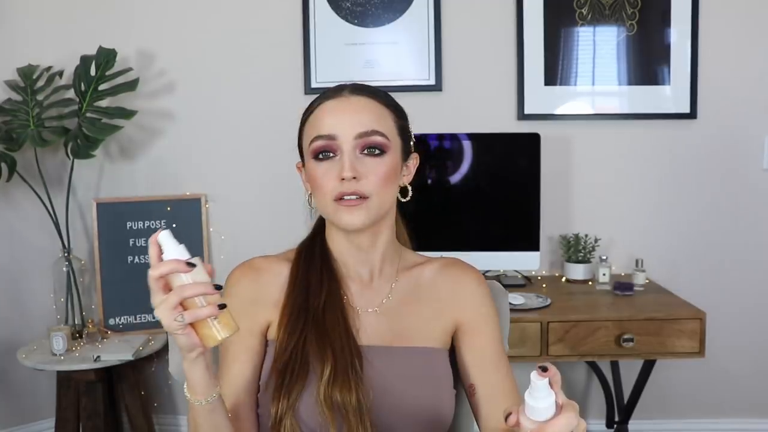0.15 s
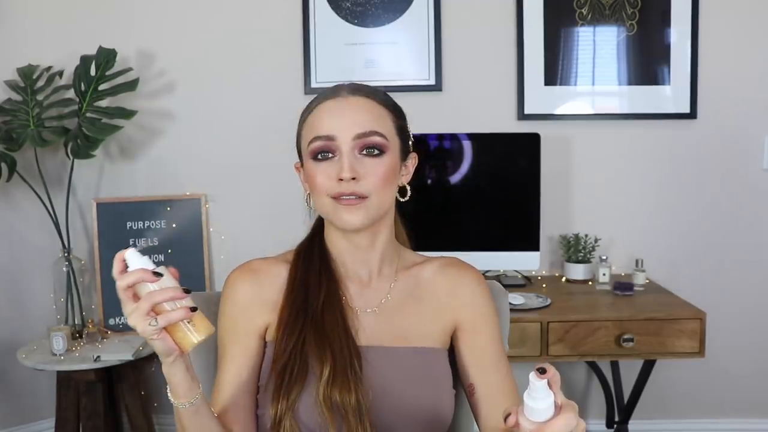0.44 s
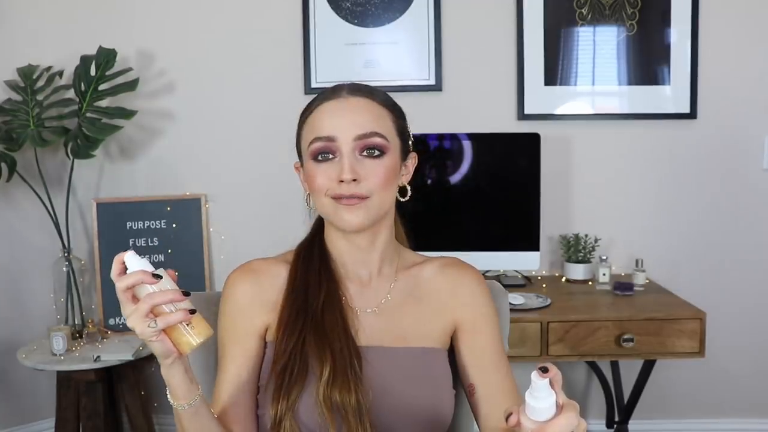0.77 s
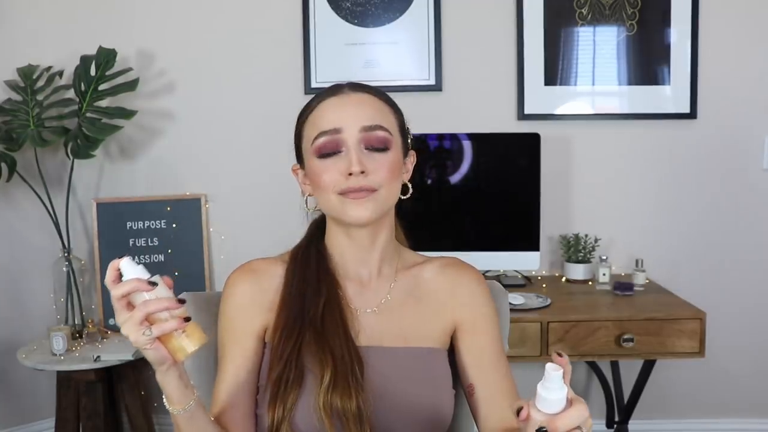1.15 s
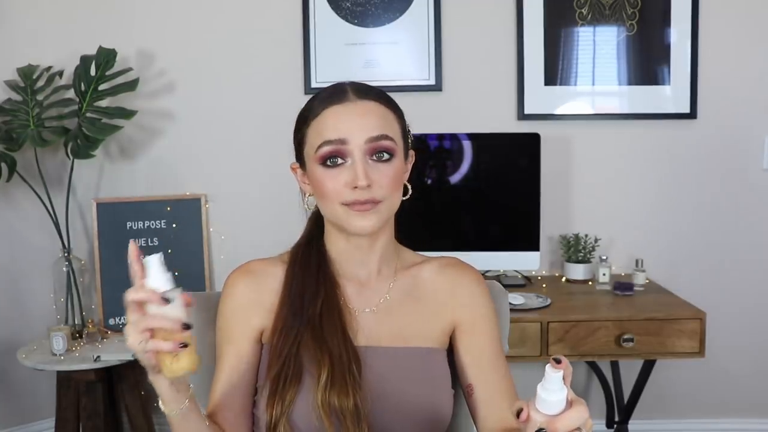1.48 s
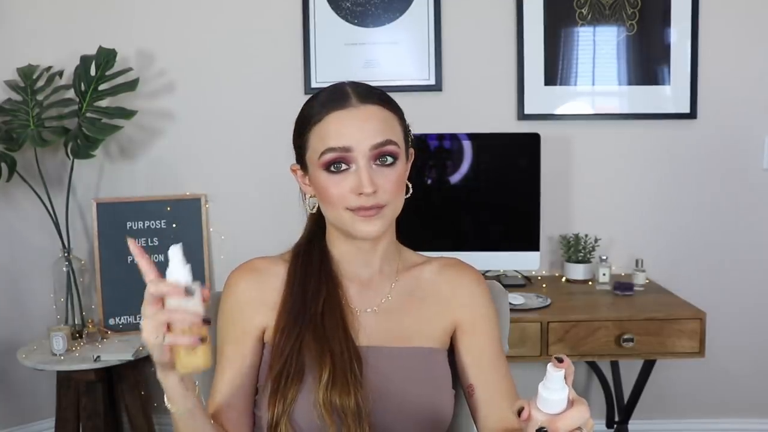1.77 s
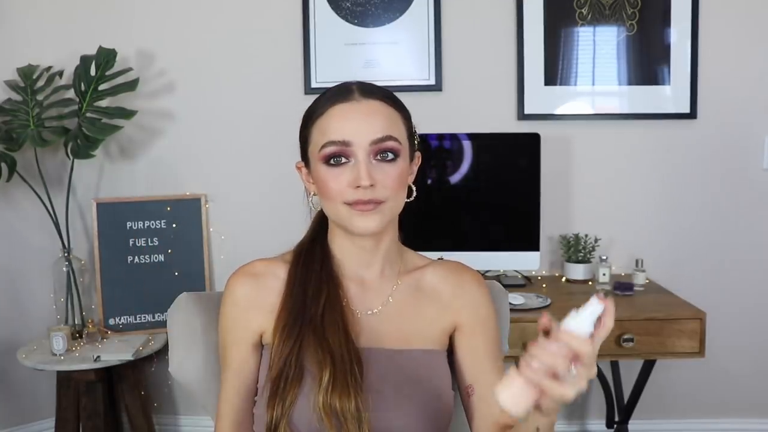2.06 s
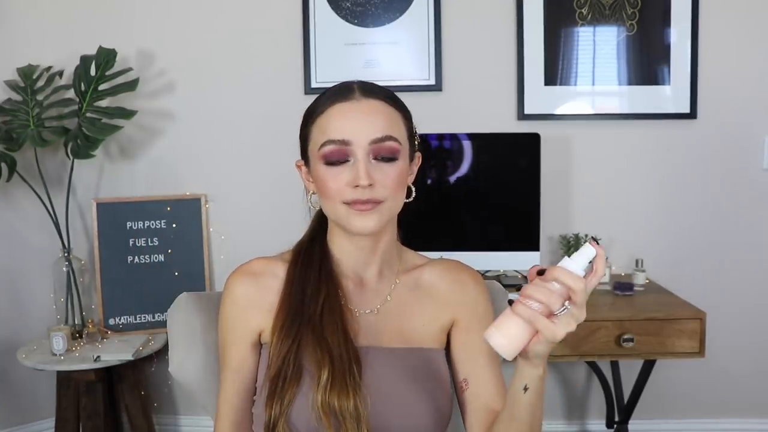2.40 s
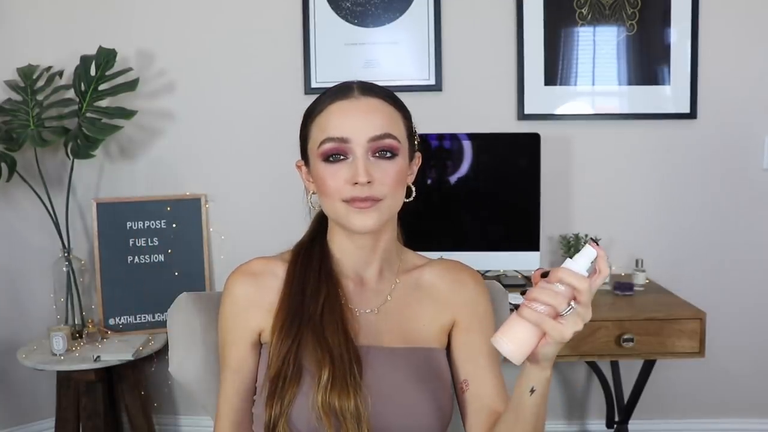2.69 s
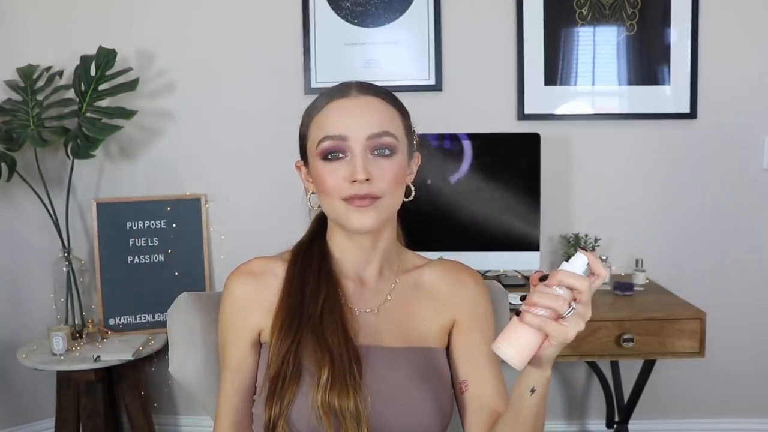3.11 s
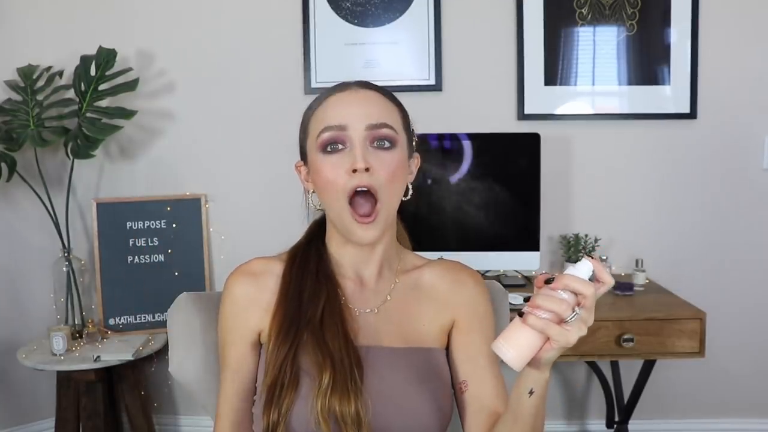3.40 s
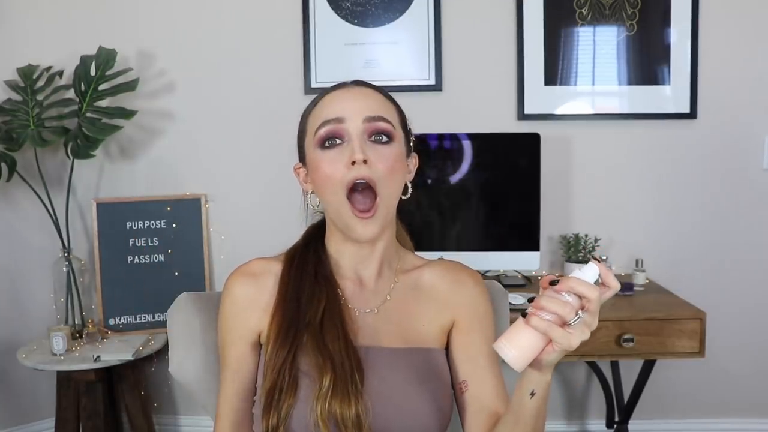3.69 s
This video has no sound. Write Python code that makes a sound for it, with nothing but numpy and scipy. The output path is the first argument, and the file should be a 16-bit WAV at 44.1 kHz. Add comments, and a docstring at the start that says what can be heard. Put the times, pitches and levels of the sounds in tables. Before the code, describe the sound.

Two sprays from pump bottles, one brief, one longer, with small plastic clicks indoors.

```python
"""Two pump bottles are sprayed in a small room, close to one microphone.
Mains hum, a faint buzz and thin electronic hiss run throughout: harmonic sines and filtered noise.
Ringing plastic ticks and small wet clicks lead to a short, coarse spritz of pressure-shaped noise.
More ticks and dull bottle knocks follow, then soft handling rustle: swells of filtered noise.
After further ticks comes a longer, finer mist; small wet clicks run through it and one last follows."""
import sys
import numpy as np
from scipy import signal
from scipy.fft import rfft, irfft, next_fast_len
from scipy.io import wavfile

SR = 44100
rng = np.random.default_rng(int(sys.argv[2]) if len(sys.argv) > 2 else 0)


def unload_wav(signal):
    """Save mono or channel-first audio to the path in sys.argv[1] as 16-bit WAV at rate SR, clipped to [-1, 1]."""
    wavfile.write(
        sys.argv[1],
        SR,
        np.round(np.clip(np.atleast_2d(signal).T, -1, 1) * 32767).astype(np.int16),
    )


N = 169785


def amp(db):
    """Decibels to gain."""
    return 10 ** (np.asarray(db) / 20)


def curve(points, hz):
    """Read (Hz, value) points on a log-frequency axis."""
    point_hz, values = np.array(sorted(points), float).T
    return np.interp(np.log(np.maximum(hz, 1)), np.log(point_hz), values)


def colour(x, points):
    """Filter by (Hz, dB) points."""
    size = next_fast_len(len(x) + 4096)
    gain = amp(curve(points, np.fft.rfftfreq(size, 1 / SR)))
    return irfft(rfft(x, size) * gain, size)[:len(x)]


def noise(points):
    """Noise with a given density in dB per Hz."""
    return colour(rng.standard_normal(N), points) * np.sqrt(SR / 2)


def fade(t, t60):
    """Exponential decay, 60 dB down after t60 seconds."""
    return np.exp(-np.log(1000) * t / max(t60, 1e-4))


def add(out, start, x):
    """Mix a sound in at a time in seconds."""
    i = max(int(start * SR), 0)
    out[i:i + len(x)] += x[:max(N - i, 0)]


def electronics():
    """Mains harmonics make a hum with a faint buzz above it; hiss is part shared, part per channel."""
    # stronger mains lines: harmonic (multiple of the mains), level_db (rms)
    hum = [(1, -35.5), (2, -62), (3, -58.5), (4, -66), (5, -72.5), (6, -74.5), (7, -67), (8, -73), (9, -64),
           (11, -77), (13, -77), (15, -75.5), (17, -79.5), (19, -78), (23, -76.5)]
    # hiss common to both channels: pitch_hz, density_db (per Hz)
    shared_hiss = [(20, -88), (42, -79), (100, -87), (200, -89.5), (400, -94), (600, -99), (750, -97),
                   (1100, -101), (2500, -103), (3100, -101), (3800, -104), (8000, -105), (15500, -107)]
    # hiss separate in each channel: pitch_hz, density_db (per Hz)
    channel_hiss = [(135, -135), (175, -101.5), (400, -100), (900, -100.5), (1500, -105), (3000, -105),
                    (6000, -103), (15500, -102.3)]
    mains_hz = 60
    buzz_db, buzz_fall_db = -84, -1  # other lines: rms level at 1 kHz, change per octave

    t = np.arange(N) / SR
    lines = {round(k): db for k, db in hum}
    out = noise(shared_hiss)
    phases = rng.uniform(0, 2 * np.pi, size=42)
    for k, phase in enumerate(phases, 1):
        buzz_line_db = buzz_db + buzz_fall_db * np.log2(k * mains_hz / 1000)
        db = lines.get(k, buzz_line_db)
        out = out + np.sqrt(2) * amp(db) * np.sin(2 * np.pi * k * mains_hz * t + phase)
    return out + np.array([noise(channel_hiss), noise(channel_hiss)])


def room_response():
    """Dense wall reflections after a short gap, each noise band dying at its own rate."""
    # decay of the room: pitch_hz, t60_s
    room_t60 = [(500, 0.46), (3000, 0.38), (5000, 0.4), (9000, 0.35), (15000, 0.32)]
    # tint of the reflections: pitch_hz, gain_db
    room_colour = [(300, 2), (3000, 0.5), (5000, 1), (8000, 0.5), (15000, -2)]
    room_db, gap_s = -4.5, .007  # reflection level before the tint, wait for the first reflection

    t = np.arange(SR // 2) / SR
    hz = np.fft.rfftfreq(len(t), 1 / SR)
    spectrum = rfft(rng.standard_normal(len(t)))
    edges = np.geomspace(100, SR / 2, 13)
    tail = np.zeros(len(t))
    for lo, hi in zip(edges, edges[1:]):
        band = irfft(spectrum * (hz >= lo) * (hz < hi), len(t))
        tail += band * fade(t, curve(room_t60, np.sqrt(lo * hi)))
    tail = colour(tail / np.sqrt(np.sum(tail ** 2)), room_colour)  # unit energy, then tint
    return amp(room_db) * np.concatenate([np.zeros(int(gap_s * SR)), tail])


def handling():
    """Skin rubbing on plastic: soft bell-shaped swells of noise."""
    # fingers sliding on the bottle: centre_s, length_s, level_db (relative to the rub noise)
    rubs = [(1.892, 0.097, 2), (2.07, 0.13, -2), (2.237, 0.15, -4)]
    # rub noise: pitch_hz, density_db (per Hz)
    rub_colour = [(500, -114), (1500, -105), (3200, -100), (5200, -99), (8000, -104), (15000, -116)]

    t = np.arange(N) / SR
    swells = sum(amp(db) * np.exp(-(2 * (t - centre) / length) ** 2) for centre, length, db in rubs)
    return noise(rub_colour) * swells


def bottle_knocks():
    """The hand-held bottle jolts dully as the pump is pressed or let go, with a faint low ring."""
    # knocks: start_s, level_db (before the body's tint)
    knocks = [(0.1425, -27.5, ), (.363, -27), (1.463, -31), (1.482, -31), (1.503, -32), (1.5091, -20),
              (2.806, -31), (2.811, -39)]
    # tint of the jolts: pitch_hz, gain_db
    body_colour = [(200, -36), (400, -7.5), (560, -4.5), (720, -13), (1000, -7), (1300, -11), (2000, -9),
                   (3500, -15), (5000, -19), (7000, -32), (12000, -47)]
    # low ring of the bottle: pitch_hz, level_db (relative to the knock), t60_s
    body_modes = [(410, -32.5, 0.12), (720, -20, 0.047)]
    jolt_t60_s = 0.031

    jolts, rings = np.zeros(N), np.zeros(N)
    t = np.arange(SR // 2) / SR
    ring = sum(amp(db) * np.sin(2 * np.pi * hz * t) * fade(t, t60) for hz, db, t60 in body_modes)
    for start, db in knocks:
        add(jolts, start, amp(db) * rng.standard_normal(len(t)) * fade(t, jolt_t60_s))
        add(rings, start, amp(db) * ring)
    return colour(jolts, body_colour) + rings


def wet_clicks():
    """Each click is a bright noise snap and a softer hollow pop of decaying cavity modes."""
    # clicks: start_s, snap_db (before the tint), pop_db, pop_hz
    clicks = [(.038, -44, -51, 600), (.080, -46, -59, 650), (1.932, -39.5, -48, 710),
              (1.945, -41.5, -47, 730), (2.139, -44.5, -60, 700), (2.630, -48, -52, 663),
              (2.708, -37.5, -50.5, 650), (2.716, -40, -48, 650), (2.799, -36, -48, 740),
              (2.810, -36, -45, 736), (2.852, -38, -47, 850), (2.925, -39, -45, 670),
              (3.009, -32.5, -41.5, 695), (3.163, -47, -47, 1130), (3.424, -37.5, -42, 654)]
    # tint of the snaps: pitch_hz, gain_db
    snap_colour = [(250, -22), (700, -1), (1800, 6), (3200, -10), (4200, -2), (4900, 9), (6200, -7.5),
                   (8000, 0), (11000, -10), (15000, -13)]
    # cavity modes: ratio (multiple of pop_hz), level_db, t60_s
    pop_modes = [(1, 3, 0.041), (1.22, -6, 0.033), (2.45, -10, .012)]
    snap_t60_s, pop_rise_s = 0.014, 0.0015

    snaps, pops = np.zeros(N), np.zeros(N)
    t = np.arange(SR // 10) / SR
    for start, snap_db, pop_db, hz in clicks:
        add(snaps, start, amp(snap_db) * rng.standard_normal(len(t)) * fade(t, snap_t60_s))
        cavity = sum(amp(db) * np.sin(2 * np.pi * hz * k * t) * fade(t, t60) for k, db, t60 in pop_modes)
        add(pops, start, amp(pop_db) * cavity * (1 - np.exp(-t / pop_rise_s)))
    return colour(snaps, snap_colour) + pops


def pump_ticks():
    """A clean strike or a brief scrape sets the plastic pump head ringing for a few milliseconds."""
    # ticks: start_s, level_db (peak), ring_hz, ring_t60_s,
    # scrape_t60_s (the head drags in its collar before it seats)
    tick_list = [(.032, -47.5, 2930, .009, 0.037), (.075, -47.5, 2820, 0.0079, 0.036),
                 (0.1423, -29, 2720, 0.0067, .0003), (1.050, -42, 3160, 0.0076, 0.011),
                 (1.139, -51, 2470, 0.0081, 0.014), (1.44, -43, 2600, 0.0067, 0.023),
                 (1.451, -42.5, 2040, 0.01, .03), (1.463, -41, 2200, 0.004, 0.0055),
                 (1.5, -37.5, 2750, 0.015, .0003), (1.5082, -16.5, 3120, 0.0083, 0.00037),
                 (2.593, -38.5, 2690, 0.0088, .014), (2.655, -46, 2570, .007, .04),
                 (2.669, -45, 2500, .007, .03), (2.805, -36, 2080, 0.0074, .025)]
    # modes of the pump head: ratio (multiple of ring_hz), level_db
    head_modes = [(1, 0.5), (1.08, -18.5), (1.2, -14), (.66, -17.5), (1.6, -40)]
    push_s = 0.00084  # softens the onset of the ring

    out = np.zeros(N)
    t = np.arange(SR // 10) / SR
    for start, db, hz, t60, scrape_t60 in tick_list:
        ring = sum(amp(mode_db) * np.sin(2 * np.pi * hz * k * t) for k, mode_db in head_modes)
        ring = ring * fade(t, t60) * (1 - np.exp(-t / push_s)) ** 2
        contact = rng.exponential(size=len(t)) ** 2 * fade(t, scrape_t60)  # uneven tiny impacts
        tick = np.diff(signal.fftconvolve(ring, contact)[:len(t)])  # the difference tilts it brighter
        add(out, start, amp(db) * tick / np.abs(tick).max())
    return out


def spray(stroke, nozzle):
    """An open valve hisses brighter and finer as pressure builds, then shuts within milliseconds."""
    sputter_db, sputter_rate_hz = 1.0, 180  # unevenness of the jet
    atomise_hz, atomise_power = 6500, 1.5  # hiss above this pitch needs full pressure, comes in later
    near_echo_s, near_echo_db = .00145, -20  # bounce off the hand and face

    start, length, db, first_pressure, rise, shut = stroke
    clock = np.arange(N) / SR
    t = clock - start
    pressure = np.clip(1 - (1 - first_pressure) * np.exp(-np.maximum(t, 0) / rise), 0, 1)
    valve = (t > 0) * np.exp(-np.maximum(t - length, 0) / shut)
    sputter = np.interp(clock * sputter_rate_hz, np.arange(N), rng.standard_normal(N))

    hiss = noise(nozzle)
    highpass = signal.butter(2, atomise_hz, "high", fs=SR, output="sos")
    fine = signal.sosfiltfilt(highpass, hiss)
    coarse = hiss - fine
    jet = (coarse + fine * pressure ** atomise_power) * pressure * valve
    jet = jet * amp(db + sputter_db * sputter)
    return jet + amp(near_echo_db) * np.roll(jet, int(near_echo_s * SR))


def scene():
    """Bottles and room reach one microphone, alike in both channels; the electronics add their own."""
    # strokes: start_s, length_s, level_db (relative to the nozzle noise), starting_pressure (0-1),
    # pressure_rise_s, shut_off_s
    spritz_stroke = (0.3625, 0.12, 0.75, 0.65, .035, .008)
    mist_stroke = (2.808, 0.5026, 0.35, 0.47, 0.038, 0.0029)
    # nozzle noise: pitch_hz, density_db (per Hz)
    spritz_nozzle = [(400, -104), (750, -84), (1000, -84), (1300, -77.5), (1700, -78), (2050, -71.5),
                     (2400, -73.5), (3200, -68), (3700, -70.5), (4400, -66), (4800, -69), (5300, -66.5),
                     (6200, -75.5), (8500, -77.5), (12500, -77.5), (15500, -83)]
    mist_nozzle = [(500, -108), (1000, -96), (1700, -89), (2300, -91.5), (2900, -84), (4100, -82),
                   (4550, -77.5), (4850, -80.5), (5150, -73), (5500, -80.5), (7000, -83), (8600, -83),
                   (10000, -80), (12700, -80), (15500, -84.5)]
    # levels sent to the walls, dB relative to the direct sound
    spritz_wet_db, mist_wet_db, tick_wet_db, click_wet_db = -1.9, -6.5, -3, -5

    bottles = bottle_knocks() + handling()
    clicks = wet_clicks()
    ticks = pump_ticks()
    spritz = spray(spritz_stroke, spritz_nozzle)
    mist = spray(mist_stroke, mist_nozzle)

    direct = spritz + mist + ticks + bottles + clicks
    to_walls = amp(spritz_wet_db) * spritz + amp(mist_wet_db) * mist
    to_walls = to_walls + amp(tick_wet_db) * ticks + bottles + amp(click_wet_db) * clicks
    walls = signal.fftconvolve(to_walls, room_response())[:N]
    return direct + walls + electronics()


def record(dry):
    """The recorder cuts the top of the treble with a steep low-pass."""
    top_hz = 15800
    lowpass = signal.ellip(12, .1, 80, top_hz, fs=SR, output="sos")
    return signal.sosfilt(lowpass, dry)


dry = scene()
out = record(dry)
unload_wav(out)
```